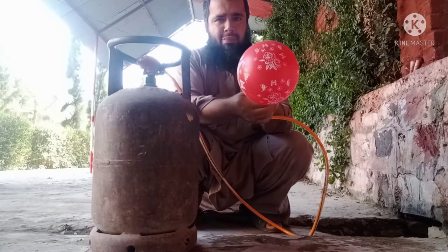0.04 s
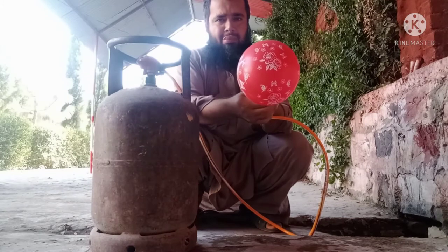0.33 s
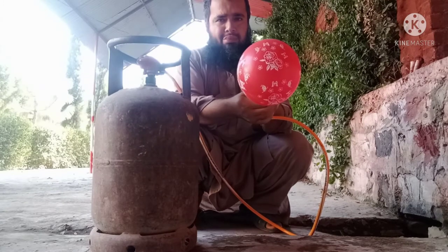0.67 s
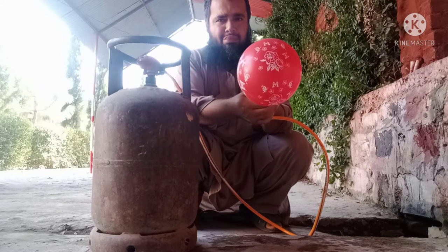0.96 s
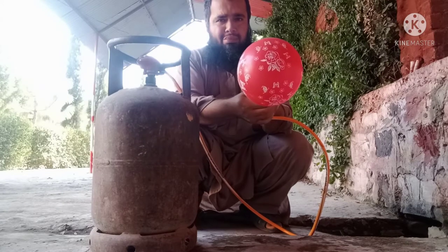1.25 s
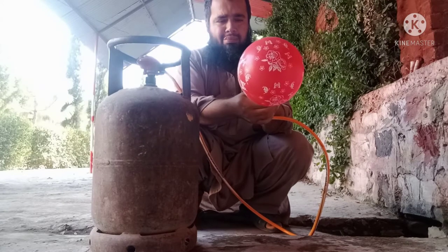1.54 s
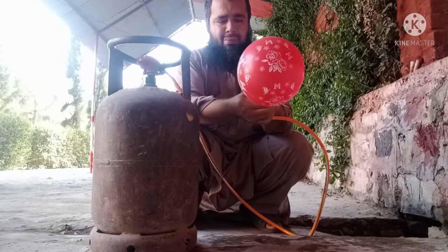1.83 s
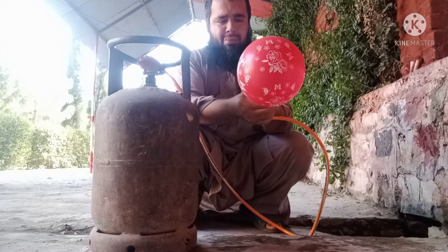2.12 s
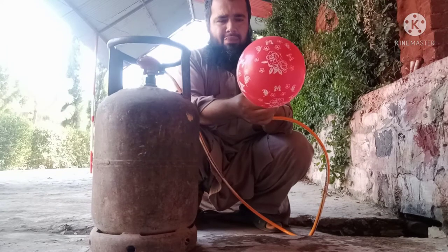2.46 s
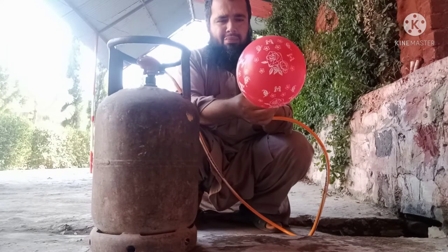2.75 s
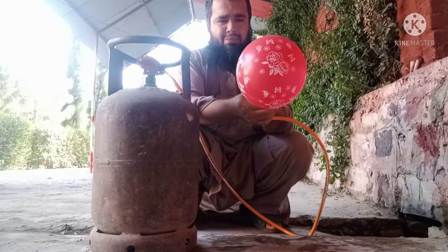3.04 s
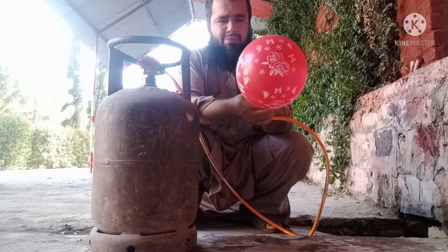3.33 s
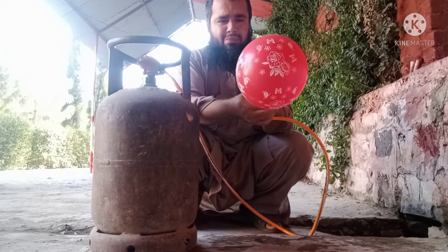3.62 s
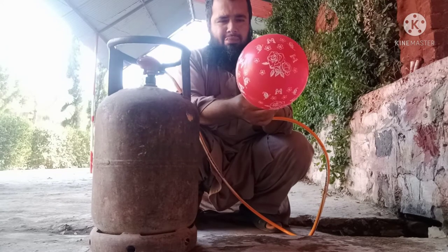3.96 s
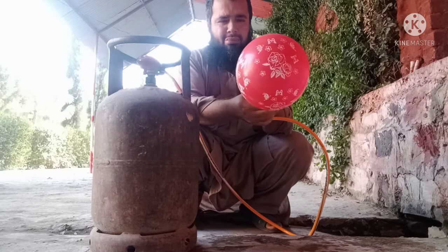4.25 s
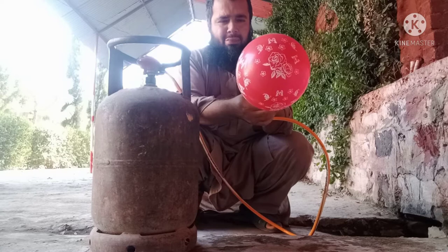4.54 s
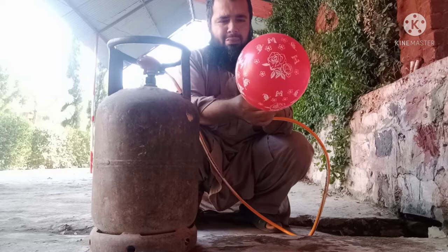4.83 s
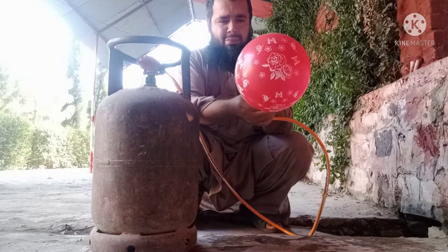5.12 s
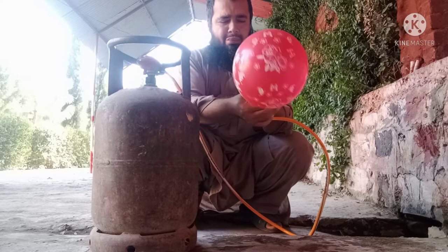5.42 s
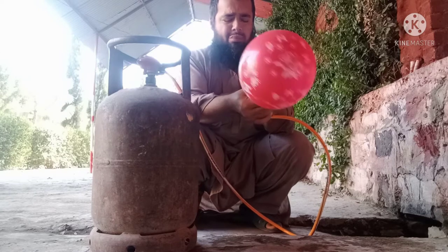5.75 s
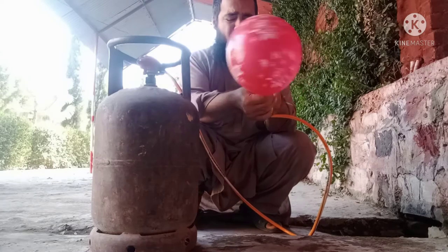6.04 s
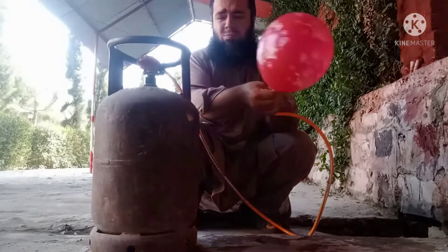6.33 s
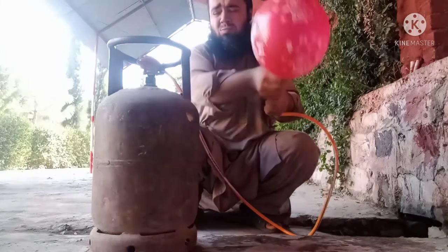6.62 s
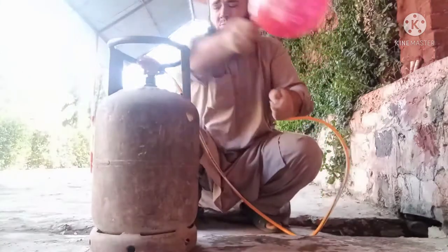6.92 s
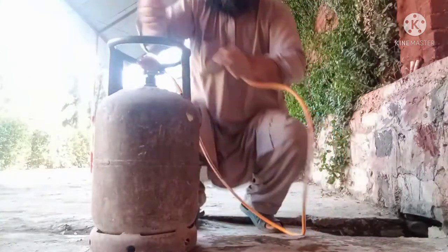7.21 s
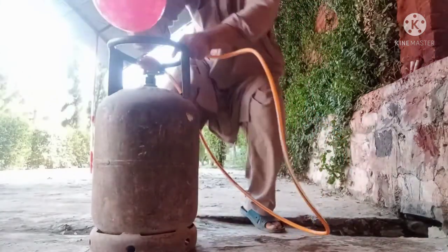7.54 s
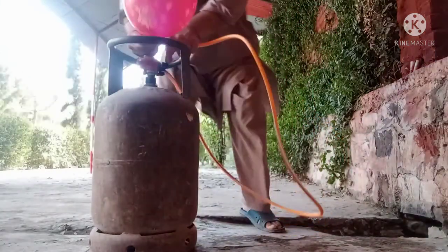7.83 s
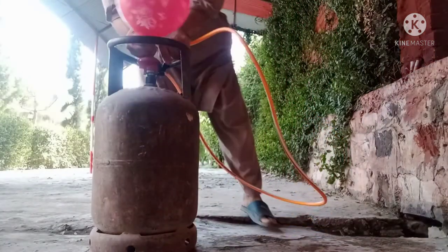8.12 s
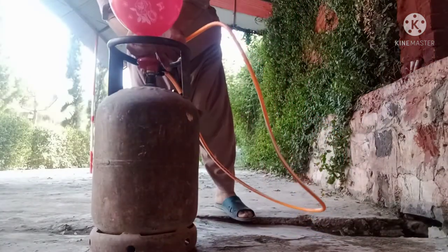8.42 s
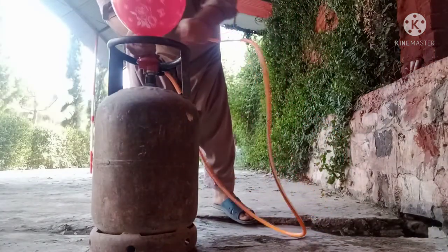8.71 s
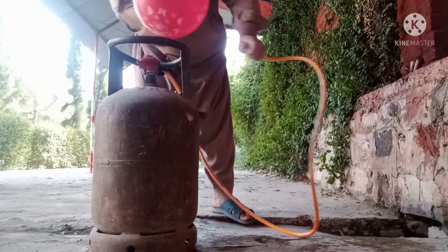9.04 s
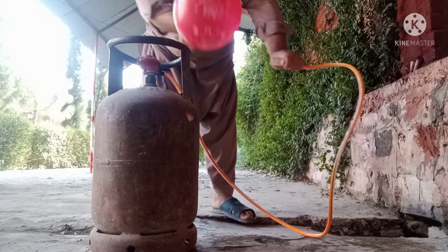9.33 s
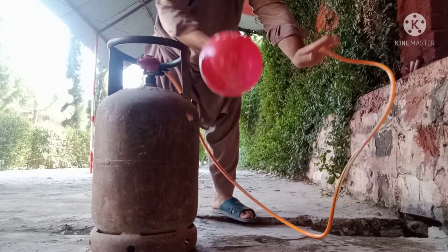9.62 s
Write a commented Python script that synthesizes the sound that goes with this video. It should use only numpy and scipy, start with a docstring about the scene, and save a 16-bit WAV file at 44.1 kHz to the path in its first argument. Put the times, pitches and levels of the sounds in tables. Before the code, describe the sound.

A balloon fills with a steady ringing hiss, followed by a sharp spurt of gas, light handling and bird calls.

```python
"""A walled yard, one microphone close to a gas cylinder, birds squawking and whistling farther off.
Gas hisses through a ringing hose into a balloon, over a low hum. After five seconds the flow
stops; gas leaks at the stretched neck, then bursts out as the neck comes off the hose. Clothes rustle,
the balloon is bumped about, and one more puff escapes. The handling and the birds go on to the end."""
import sys
import numpy as np
from scipy import signal
from scipy.fft import rfft, irfft, next_fast_len
from scipy.io import wavfile
from scipy.ndimage import uniform_filter1d, map_coordinates

SR = 44100
rng = np.random.default_rng(int(sys.argv[2]) if len(sys.argv) > 2 else 0)


def master(y):
    """Save y as 16-bit WAV."""
    cut = np.clip(np.atleast_2d(y).T, -1, 1)
    pcm = np.round(cut * 32767)  # scale
    wavfile.write(sys.argv[1], SR, pcm.astype(np.int16))


N = 426447
TIME = np.arange(N) / SR
FREQS = np.fft.rfftfreq(N, 1 / SR)
# resonances of hose and nozzle: centre_hz, width_hz, relative_db
HOSE_MODES = [(2170.6, 64, -8.5), (2246, 80, -13), (2492, 160, -12.5), (2480, 51, -17), (3144, 90, -19.5),
              (3640, 150, -13.5), (3719, 34, -1), (3834, 240, -4.5), (3971, 92, -4), (4116, 98, -12),
              (4385, 340, -20), (5148, 150, -17), (5627, 131, -16), (6285, 240, -20), (6740, 300, -18.5),
              (6850, 110, -18), (7094, 126, -14), (7470, 350, -19), (7800, 1500, -28), (8590, 344, -22),
              (9700, 43, -30.5), (9870, 210, -29), (10790, 120, -29.5), (11100, 120, -24.5),
              (11570, 160, -30), (12900, 88, -21.5), (13030, 420, -37.5), (14620, 450, -25),
              (14800, 413, -29.5)]


def filling():
    """Close up, the jet rings the hose, with narrow steady tones in its hiss; turbulence flutters it."""
    # the flow builds as the valve opens further, then is shut off: time_s, level_db
    flow = [(0, -49), (1.9, -49), (2.3, -47.5), (3.3, -47), (5.04, -47.5), (5.09, -54.5), (5.13, -74)]
    jet_colour = [(25, -24), (60, -31), (150, 6.5), (300, 2), (700, -2.5), (1400, -0.5), (2000, -9),
                  (4000, -8), (5900, -5), (8000, -8.5), (9200, -21), (10300, -1), (11200, 5.5), (13800, -4),
                  (15500, -1)]  # broad hiss: frequency_hz, relative_db
    ringing_tones = [(2180, -58), (2455, -63.5), (2751, -75), (2810, -91), (2853, -105), (3015, -78),
                     (3575, -78), (3628, -64), (3714, -51.5), (3871, -54), (4081, -54), (5141, -68.5),
                     (5631, -69), (6202, -71), (7138, -59), (7488, -78)]  # narrow steady tones in the hiss: centre_hz, relative_db
    nozzle_whistle = [(0, -72), (1.6, -77.5), (2.5, -68), (3.6, -76), (5.05, -103)]  # time_s, level_db
    jet = noise(resonances(HOSE_MODES)) + amp(-21.5) * coloured_noise(jet_colour)
    jet = patchy(jet, depth_db=2.87, band_hz=110, hold_s=0.28)
    ringing = noise(resonances([(hz, 22, db) for hz, db in ringing_tones]))  # each 22 Hz wide
    flutter = amp(0.65 * wander(hz=27) + 0.2 * wander(hz=242) + 0.24 * wander(hz=3.6))
    whistle = level(nozzle_whistle) * noise(resonances([(10820, 320, 0)]))
    hiss = hand_wobble(yard(jet, wet_db=-6) + amp(-9) * ringing)
    return flutter * (level(flow) * hiss + whistle)


def hand_wobble(x, share=0.000987):
    """The resonances drift up and down as hose and balloon move in the hand."""
    drift = np.cumsum(share * wander(hz=5))
    return map_coordinates(x, [np.arange(N) + drift], order=5, mode="mirror")


def neck_leak():
    """Gas seeps past the stretched neck and rings it; then the gap widens."""
    pushes = [(5.588, 0.011, 0.1, -57, 1.5), (5.7, .03, 0.044, -50, -5.5), (5.78, .04, 0.18, -45.5, -1.5),
              (5.98, .03, 0.11, -44.5, -1.5), (6.11, .05, 0.089, -39, 1.5)]  # start_s, rise_s, hold_s, level_db, tilt_db_per_octave
    colour = [(100, -38.5), (300, -29), (460, -17), (650, -19.5), (1400, -11), (1900, -9), (2400, -9.5),
              (3100, -11.5), (3650, 3.5), (4700, -8), (7200, -10), (9200, -20.5), (15000, -20)]  # frequency_hz, relative_db
    neck_modes = [(1360, 220, -13), (2160, 84, -11), (2470, 61, -9), (3632, 59, -4), (3830, 18, 1),
                  (4590, 66, -17), (5130, 75, -14.5), (5440, 65, -12), (5940, 51, -10), (7400, 26, -13.5),
                  (7100, 110, -13.5), (7350, 150, -12), (8370, 130, -12.5), (10350, 150, -21.5),
                  (10600, 110, -21.5), (12500, 49, -29), (14600, 200, -26), (15300, 170, -22.5)]  # centre_hz, width_hz, relative_db
    return escape(pushes, colour, neck_modes, ring_db=-5.5, flutter_db=1, fade_db_per_s=200)


def burst():
    """Gas bursts out as the neck comes off the hose."""
    pushes = [(6.16, 0.0026, 0.023, -32.5, -4), (6.19, .03, 0.065, -35, 2.5)]  # start_s, rise_s, hold_s, level_db, tilt_db_per_octave
    colour = [(100, -53.5), (350, -24.5), (700, -29.5), (1400, -12.5), (2450, -0.5), (3150, -12.5),
              (3900, -4.5), (4800, -11), (6200, -13), (7150, 5.5), (9200, -16), (11000, -15), (15000, -7)]  # frequency_hz, relative_db
    return escape(pushes, colour, HOSE_MODES, ring_db=-9, flutter_db=2.1, fade_db_per_s=379.5)


def last_puff():
    """One more puff rings the hose: a sharp start, then two pushes."""
    pushes = [(7.812, 0.0028, .008, -48.5, 0), (7.815, .01, 0.1, -52, 1), (7.885, 0.029, 0.07, -48.5, -2)]  # start_s, rise_s, hold_s, level_db, tilt_db_per_octave
    colour = [(100, -31), (720, -23), (1130, 5), (1700, -9.5), (2300, 2), (3700, -4), (5200, -5),
              (7200, -7), (8800, -10), (9600, -28), (12500, -21), (15000, -21)]  # frequency_hz, relative_db
    return escape(pushes, colour, HOSE_MODES, ring_db=-8, flutter_db=1, fade_db_per_s=316)


def escape(pushes, colour, modes, ring_db, flutter_db, fade_db_per_s):
    """Escaping gas: a broad jet, each push with its own brightness, and some ring of the opening."""
    power = np.array([surge(*row[:4], fade_db_per_s) ** 2 for row in pushes]) + 1e-20
    tilt = np.transpose(pushes)[4] @ power / power.sum(0)  # the loudest push leads
    jet = patchy(coloured_noise(colour), depth_db=3, band_hz=170, hold_s=0.21)
    jet += amp(ring_db) * noise(resonances(modes))
    hz, t, spectra = signal.stft(jet, SR, nperseg=256)
    gain = amp(np.log2((hz[:, None] + 500) / 4000) * np.interp(t, TIME, tilt))
    gain /= np.sqrt(np.mean(abs(spectra) ** 2, 1) @ gain ** 2)  # tilting keeps the power
    jet = unit(signal.istft(spectra * gain, SR, nperseg=256)[1][:N])
    return jet * np.sqrt(power.sum(0)) * amp(flutter_db * wander(hz=193.3))


def surge(start_s, rise_s, hold_s, db, fade_db_per_s):
    """Gain of one push of gas: it rises, holds, and dies as the pressure is spent."""
    fading_s = np.maximum(TIME - start_s - rise_s - hold_s, 0)
    return np.clip((TIME - start_s) / rise_s, 0, 1) * amp(db - fade_db_per_s * fading_s)


def handling():
    """Near the microphone, rubber and hose snap and knock, the balloon is bumped, clothes rub."""
    knocks = [(5.593, -54, 7000, 0.41, 0.024), (5.64, -54.5, 1230, 0.53, 0.17),
              (5.702, -39, 1750, 1.04, 0.099), (5.743, -41, 1350, 0.72, 0.058),
              (6.1615, -22, 3060, 0.85, 0.028), (6.814, -58.5, 970, 0.55, 0.25),
              (6.815, -55.5, 187, 0.44, 0.15), (7.13, -71, 577, 0.13, .15), (7.233, -44, 1210, 0.66, 0.075),
              (7.235, -59, 600, 0.23, 0.074), (7.236, -64, 190, 0.51, 0.19),
              (7.255, -56.5, 1350, 1.08, 0.37), (7.813, -41.5, 5570, 1.6, 0.12),
              (7.9095, -39, 2800, 0.78, 0.011), (8.37, -67, 1000, 0.33, 0.18),
              (8.376, -56, 6300, 0.26, 0.018), (8.815, -52, 1290, 0.099, .12),
              (8.865, -69, 524, 0.095, 0.24)]  # start_s, level_db, centre_hz, spread_octaves, t60_s
    bumps = [(6.03, 0.093, -62.5, 463), (6.18, 0.13, -62, 458), (6.255, 0.036, -66, 332),
             (6.81, 0.017, -51.5, 347), (7.235, 0.074, -71.5, 297), (7.54, 0.074, -65, 313),
             (8.17, 0.089, -67, 320), (8.483, 0.063, -56.5, 321)]  # start_s, length_s, level_db, pitch_hz
    return play(knocks, knock) + play(bumps, bump) + rustle()


def knock(db, centre_hz, octaves, t60_s):
    """A sudden crack of noise in one band; a small, light thing radiates no bass."""
    t = TIME[:SR // 4]
    hz = np.fft.rfftfreq(len(t), 1 / SR)
    band = np.exp(-.5 * (np.log2((hz + 1) / centre_hz) / octaves) ** 2)
    crack = unit(irfft(rfft(rng.standard_normal(len(t))) * band, len(t)))
    bass_cut = signal.butter(3, centre_hz / 3, "high", fs=SR, output="sos")
    return signal.sosfilt(bass_cut, crack * amp(db - 60 * t / t60_s))


def bump(length_s, db, hz):
    """The balloon's skin gives a brief hollow wobble under the hand."""
    size = int(length_s * SR)
    phase = 2 * np.pi * np.cumsum(hz * (1 + 0.072 * wander(73, size))) / SR
    skin = np.sin(phase) * (1 + 0.53 * wander(68, size))
    return amp(db) * unit(skin) * np.sin(np.linspace(0, np.pi, size))


def rustle():
    """Grainy rubs of cloth and rubber swell and fade, with shifting resonances and a high fizz."""
    rubs = [(6.767, 0.12, -78.5, -96), (6.876, 0.17, -69, -81), (7.145, 0.088, -57, -80),
            (7.29, 0.12, -64.5, -80), (7.58, 0.1, -69.5, -102), (7.79, 0.14, -70, -100),
            (8.41, 0.13, -67, -105), (8.566, .2, -69.5, -85), (8.77, 0.25, -65, -75.5),
            (9.07, 0.084, -75.5, -88), (9.217, .045, -79, -76), (9.34, 0.052, -74, -105),
            (9.535, 0.13, -83, -105)]  # middle_s, length_s, level_db, fizz_db
    colour = [(40, -30), (100, -15), (300, -3.5), (550, -12), (1100, 7.5), (2000, 2), (4000, -4),
              (5200, -2), (7600, 3), (9500, -13.5), (11200, -25), (12300, -25), (15000, -18.5)]  # frequency_hz, relative_db
    middle_s, length_s, db, fizz_db = np.transpose(rubs)
    swells = np.exp(-4.5 * ((TIME - middle_s[:, None]) / length_s[:, None]) ** 2)
    grain = amp(2 * wander(hz=300) + 2 * wander(hz=41.3))
    cloth = patchy(coloured_noise(colour), depth_db=5, band_hz=220, hold_s=.08)
    fizz = noise(peak(13800, width_hz=5600))
    return amp(db) @ swells * unit(cloth * grain) + amp(fizz_db) @ swells * unit(fizz * grain)


def squawks():
    """Across the yard, calls drop from a clear, swelling lead-in through a harsh middle to a soft tail."""
    # start_s, length_s, level_db, first_hz, last_hz, rasp_share, lead_s, lead_gain_db, tail_gain_db
    calls = [ (0.641, 0.07, -60, 2063, 1745, 0.42, 0.018, -20, -30),
             (2.275, 0.13, -47, 2960, 2600, 0.41, .03, -4, -14),
             (2.725, 0.1, -44.5, 2980, 2553, .5, 0.027, -16, -12.5),
             (3.039, 0.098, -50, 2895, 2624, 0.56, .02, -18, -22),
             (3.533, 0.076, -44.5, 2950, 2530, 0.72, 0.024, -15, -17),
             (4.41, 0.12, -46.5, 2775, 2530, 0.85, .06, -2, -28),
             (4.84, .096, -50.5, 2500, 2575, 0.74, .02, -18, -14.5),
             (5.352, 0.027, -46.5, 3230, 3240, 0.15, 0.038, -12, -32),
             (5.408, 0.026, -46, 3115, 3400, 0.66, 0.018, -19, -22),
             (5.442, .055, -45.5, 3536, 2204, 0.8, 0.019, -21, -20.5),
             (7.1, 0.031, -50, 3300, 2550, 0.29, 0.015, -19, -23),
             (7.13, 0.063, -51.5, 2680, 2197, 1, 0.022, -13, -10.5),
             (8.128, .026, -46.5, 3204, 2860, 0.73, 0.022, -21, -24),
             (8.152, 0.086, -43.5, 2603, 2460, 0.77, .02, -17, -23),
             (8.459, .1, -44, 2696, 2487, 0.815, 0.026, -7, -28),
             (9.145, 0.058, -63, 2546, 2345, 0.99, 0.052, -2, -28),
             (9.49, 0.09, -66.5, 2900, 2475, 0.69, .02, -12, -34)]
    mix = np.zeros(N)
    for start_s, length_s, db, first_hz, last_hz, rasp, lead_s, lead_db, tail_db in calls:
        lead = bird(lead_s, db + lead_db, first_hz * 1.36, first_hz * 1.04, rasp=0.18)
        add(mix, start_s - lead_s, lead * amp(np.linspace(-3.75, 3.75, len(lead))))
        add(mix, start_s, bird(length_s, db, first_hz, last_hz, rasp))
        tail = bird(0.0737, db + tail_db, last_hz * .8, last_hz * .69, rasp=0.64)
        add(mix, start_s + length_s - .01, tail)
    return mix


def bird_notes(sag=.025):
    """Single short bird notes, some leading into a squawk; each sags a little in pitch."""
    notes = [(0, 0.025, -72.5, 1166, 0.07), (.03, 0.024, -69, 820, .3), (.475, 0.053, -67, 1696, 0.77),
             (1.07, .13, -66, 3000, 0.15), (2.04, 0.054, -77, 803, .3), (2.57, 0.05, -74, 811, 0),
             (3.0, 0.035, -64, 869, 0.33), (5.52, 0.12, -65, 4430, 1), (6.37, 0.033, -66.5, 2256, .44),
             (6.498, 0.061, -71, 3045, 0), (6.54, 0.038, -75, 4395, 0.12), (6.785, 0.11, -70.5, 2530, 0.05),
             (6.86, 0.085, -72.5, 3480, 0.4), (7.0, 0.043, -69, 2510, 0.13), (7.06, 0.049, -71, 5110, 0.44),
             (7.67, .053, -73, 2070, 0.4), (7.32, 0.13, -68, 1695, 0.4), (7.36, .12, -65.5, 3333, 0.17),
             (7.44, 0.14, -60, 2226, 0.25), (8.1, 0.018, -53.5, 3190, 0.34),
             (8.37, 0.087, -61.5, 4480, 0.58), (8.6, .084, -67, 2576, 0.19), (8.77, 0.057, -58, 3970, 0.5),
             (8.83, .18, -67, 1845, 0.7), (9.06, 0.076, -75.5, 5600, .25), (9.31, 0.066, -59.5, 3485, 0.36),
             (9.34, 0.44, -70, 1244, 0.65)]  # start_s, length_s, level_db, pitch_hz, rasp_share
    rows = [(start_s, length_s, db, hz * (1 + sag), hz * (1 - sag), rasp)
            for start_s, length_s, db, hz, rasp in notes]
    return play(rows, bird)


def bird(length_s, db, first_hz, last_hz, rasp):
    """A whistle slides to its last pitch; rasp breaks it into uneven chirps with rough overtones."""
    throat = [(600, -30), (1100, -19.5), (1700, -15.5), (2300, -5), (3500, -5.5), (4400, -6), (5000, -18.5),
              (5800, -1), (6500, -13), (7200, -19.5), (8200, -8.5), (9200, -22.5), (10500, -50),
              (15000, -41)]  # overtone colour set by throat and beak: frequency_hz, gain_db
    chirps_per_s, drop, arch, jitter = 52, .32, .2, .06  # the last three are shares of the pitch
    size = int(length_s * SR)
    progress, rasp = np.linspace(0, 1, size), np.clip(rasp, 0, 1)
    glide = (1 - np.exp(-2.2 * progress)) / (1 - np.exp(-2.2))
    chirp_rate = chirps_per_s * (1 + .3 * wander(60, size))
    cycle = (np.cumsum(chirp_rate) / SR + .2 * rng.random()) % 1
    bend = rasp * (drop * (.5 - cycle) - arch * (np.pi / 4 - np.sin(np.pi * cycle)))
    bend += rasp ** .7 * jitter * wander(350, size)
    pitch_hz = (first_hz + (last_hz - first_hz) * glide) * (1 + bend)
    phase = 2 * np.pi * np.cumsum(pitch_hz) / SR
    buzz = np.sin(2 * phase) + 0.24 * np.sin(3 * phase) + 1.3 * rng.standard_normal(size)
    overtones = irfft(rfft(buzz) * amp(read(throat, np.fft.rfftfreq(size, 1 / SR))), size)
    pulsing = (1 - rasp + rasp * 1.7 * np.sin(np.pi * cycle) ** 2) * amp(2.5 * wander(110, size))
    voice = unit(np.sin(phase) * pulsing + amp(-7) * rasp * overtones)
    return amp(db) * voice * abs(np.sin(np.pi * progress)) ** 0.28


def far_birds(count):
    """Faint short notes in the distance, reaching the microphone mostly as echoes."""
    chatter = [(900, -78), (1600, -80), (3000, -89), (4500, -87), (6500, -74), (8000, -81.5),
               (10000, -87.5)]  # pitch_hz, loudest_db
    when, pitch, length, faintness, slide = rng.random((count, 5)).T
    hz = 1000 + 8300 * pitch ** 1.2
    db = read(chatter, hz) - 9 * faintness
    last_hz, rasp = hz * (1.02 - .08 * slide), 600 / hz
    rows = np.transpose([when * N / SR, .04 + .09 * length, db, hz, last_hz, rasp])
    return yard(play(rows, bird), wet_db=5.5)


def yard(x, wet_db):
    """Dense echoes from walls and roof, the treble dying first."""
    decay = [(100, 0.22), (1000, 0.28), (3000, 0.21), (8000, 0.19), (10500, 0.11), (15000, 0.077)]  # frequency_hz, t60_s
    size = SR // 2
    taps = rng.standard_normal(size) * (rng.random(size) < .08) * (TIME[:size] > .003)
    hz, t, spectra = signal.stft(taps, SR, nperseg=256)
    tail = signal.istft(spectra * amp(-60 * t / read(decay, hz)[:, None]), SR, nperseg=256)[1]
    echoes = signal.oaconvolve(x, tail / np.linalg.norm(tail))[:N]
    wet = amp(wet_db)
    return (x + wet * echoes) / np.sqrt(1 + wet ** 2)


def background():
    """Quiet outdoor air and a low wavering hum, stronger while gas flows."""
    hum_curve = [(0, -68.5), (2.6, -69), (3.4, -66.5), (5.05, -67.5), (5.15, -77), (6.25, -66), (6.48, -78),
                 (7.25, -72), (9.66, -75.5)]  # time_s, relative_db
    air_colour = [(30, -11.5), (70, -1.5), (110, 11), (160, 1), (250, 3), (600, -9), (2000, -10.5),
                  (4000, -20), (4450, -9), (5200, -21.5), (8000, -10.5), (9800, -20), (11000, -25),
                  (15000, -31)]  # frequency_hz, relative_db
    hum = np.sin(2 * np.pi * 100.1 * TIME + .15 * wander(hz=6))
    hum += .45 * noise(np.sqrt(peak(101, width_hz=48)))
    waver = amp(-0.26 * wander(hz=7))
    air = amp(-83.5) * coloured_noise(air_colour) * amp(2.5 * wander(hz=2.7))
    return air + amp(-3) * level(hum_curve) * waver * unit(hum)


def amp(db):
    """Decibels to gain."""
    return 10 ** (np.asarray(db) / 20)


def unit(x):
    """Scales to rms 1."""
    return x / np.sqrt(np.mean(x ** 2) + 1e-30)


def read(points, hz):
    """A table's value along a log-frequency axis."""
    f, value = np.transpose(points)
    return np.interp(np.log(hz + 1), np.log(f + 1), value)


def level(curve):
    """Gain along a curve of dB; silent before it, fading quickly after it."""
    time_s, db = np.transpose(curve)
    return amp(np.interp(TIME, time_s, db, left=-200) - 400 * np.maximum(TIME - time_s[-1], 0))


def add(mix, start_s, sound):
    """Mixes a sound in at its start time."""
    part = mix[max(round(start_s * SR), 0):][:len(sound)]
    part += sound[:len(part)]


def play(table, source):
    """Places one sound for each row."""
    mix = np.zeros(N)
    for start_s, *row in table:
        add(mix, start_s, source(*row))
    return mix


def noise(gain):
    """Noise of rms 1, shaped by a gain at each frequency."""
    return unit(irfft(rfft(rng.standard_normal(N)) * gain, N))


def coloured_noise(colour):
    """Noise of rms 1, shaped by a table of frequency_hz, relative_db."""
    return noise(amp(read(colour, FREQS)))


def wander(hz, size=N):
    """Smooth random motion of rms near 1, at up to about hz."""
    f = np.fft.rfftfreq(next_fast_len(size + SR // 4), 1 / SR)
    return unit(irfft(np.exp(2j * np.pi * rng.random(len(f)) - (f / hz) ** 2)))[:size]


def peak(hz, width_hz):
    """Power response of a steep-sided resonance."""
    return 1 / (1 + (2 * (FREQS - hz) / width_hz) ** 2) ** 2


def resonances(modes):
    """Gain at each frequency of a set of resonances."""
    return np.sqrt(sum(amp(db) ** 2 * peak(hz, width_hz) for hz, width_hz, db in modes))


def patchy(x, depth_db, band_hz, hold_s):
    """Narrow bands swell and fade on their own, as a rubbed or fluttering surface changes shape."""
    hz, t, spectra = signal.stft(x, SR, nperseg=1024, noverlap=768)
    swells = rng.standard_normal(spectra.shape)
    for axis, span in enumerate([band_hz / hz[1], hold_s / t[1]]):
        for _ in range(2):
            swells = uniform_filter1d(swells, max(round(span), 1), axis)
    spectra *= amp(depth_db * unit(swells))
    return unit(signal.istft(spectra, SR, nperseg=1024, noverlap=768)[1][:N])


def scene():
    """Gas and handling close and fairly dry; the birds farther off, with more of the yard's echo."""
    gas = neck_leak() + burst() + last_puff()
    hands = handling()
    birds = yard(squawks() + bird_notes(), wet_db=-2) + far_birds(count=280)
    close = filling() + yard(gas, wet_db=-11) + yard(hands, wet_db=-9)
    return (close + birds + background())[None]


def record(dry):
    """One microphone into a recorder that cuts off the highest treble."""
    edge_hz = 15550
    low_pass = signal.firwin(511, edge_hz, window=("kaiser", 9), fs=SR)
    return signal.oaconvolve(np.ravel(dry), low_pass, "same")[None]


dry = scene()
out = record(dry)
master(out)
```